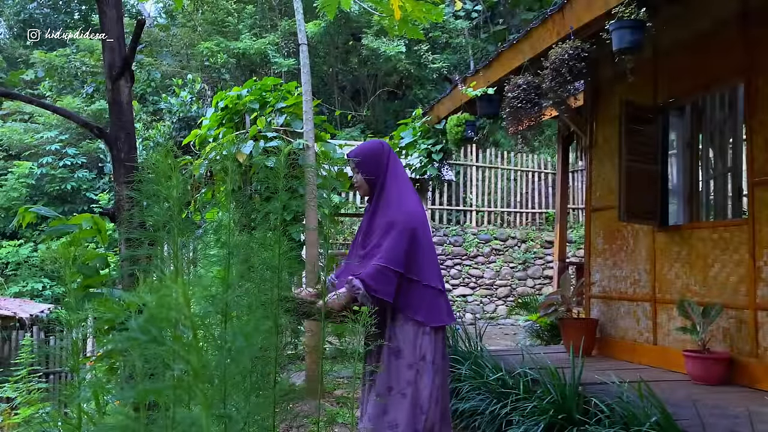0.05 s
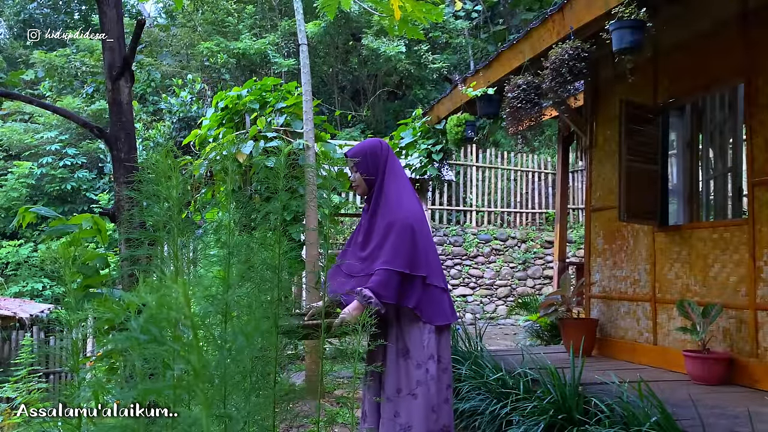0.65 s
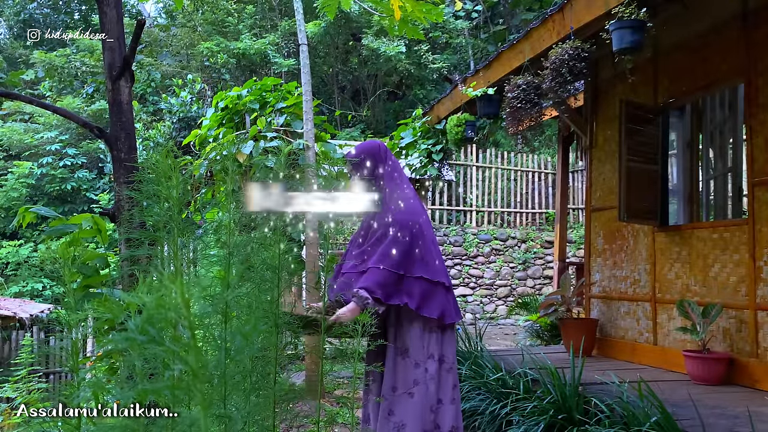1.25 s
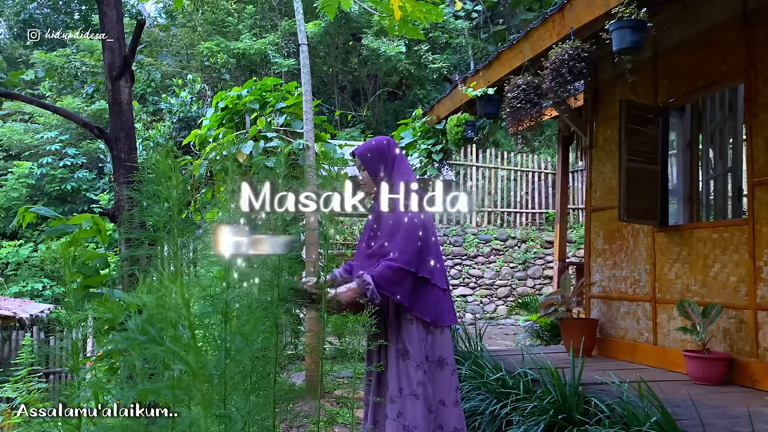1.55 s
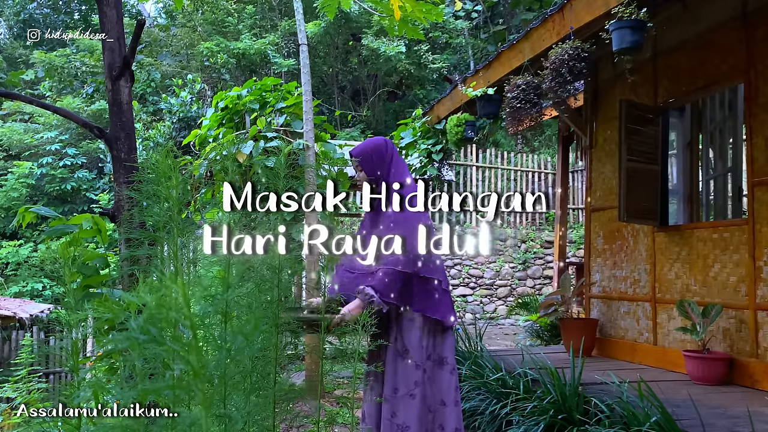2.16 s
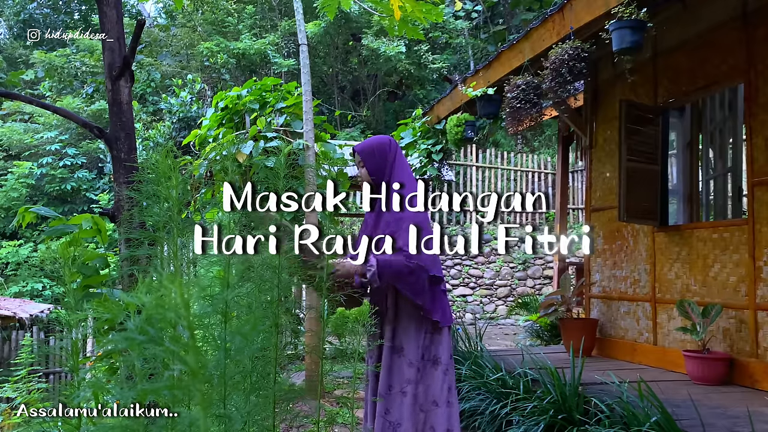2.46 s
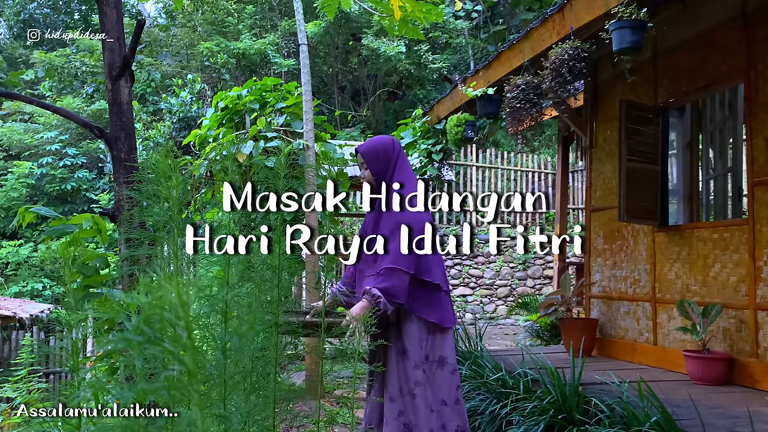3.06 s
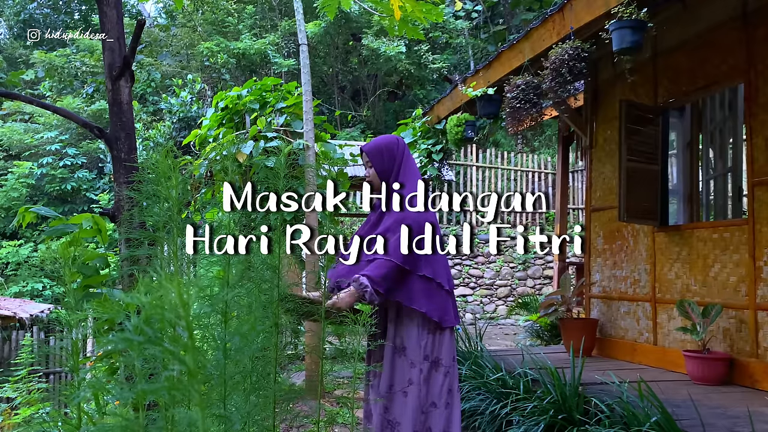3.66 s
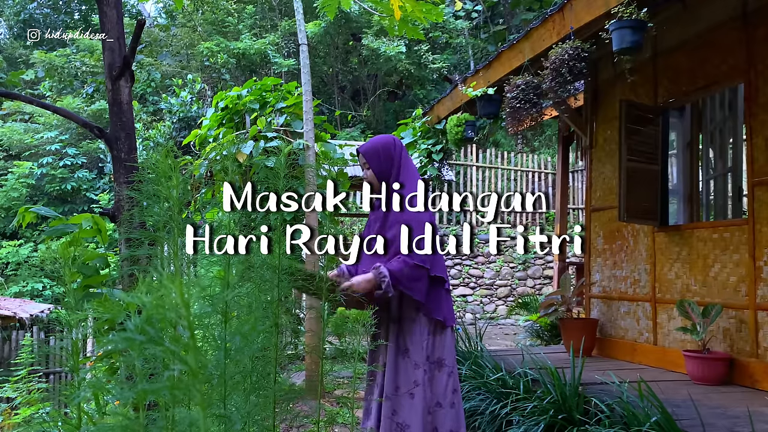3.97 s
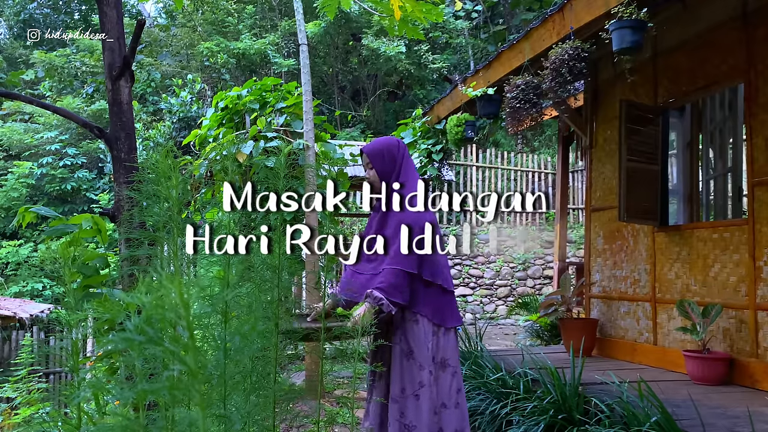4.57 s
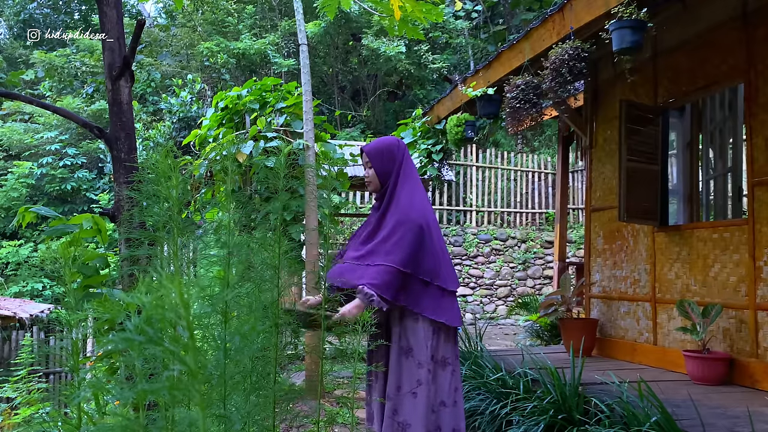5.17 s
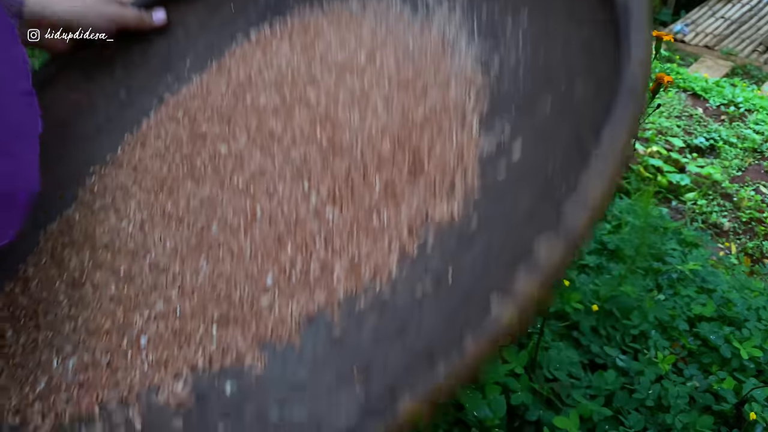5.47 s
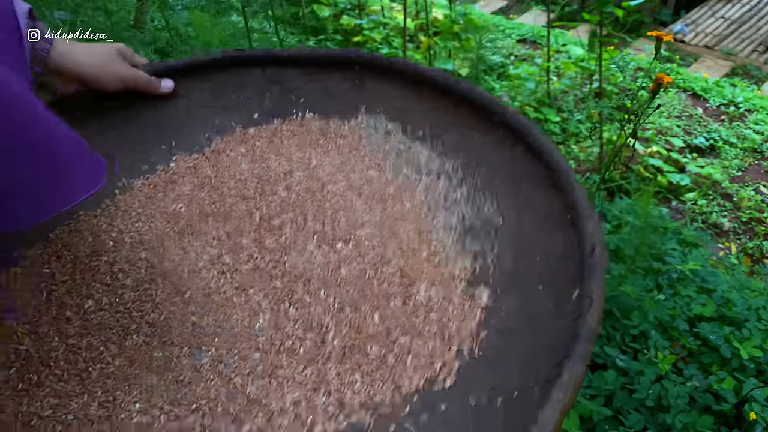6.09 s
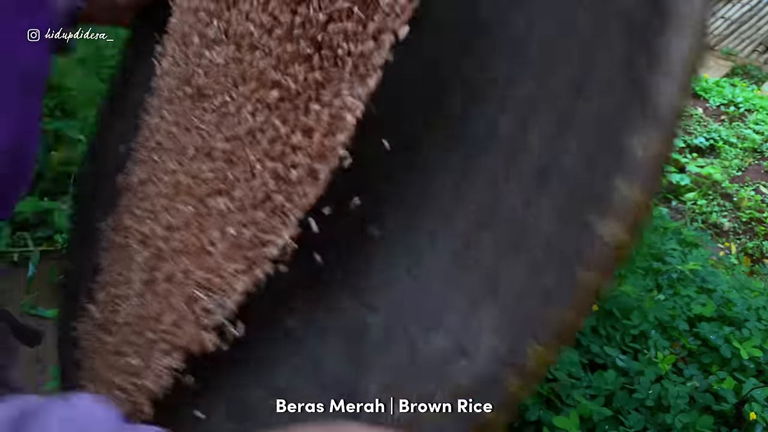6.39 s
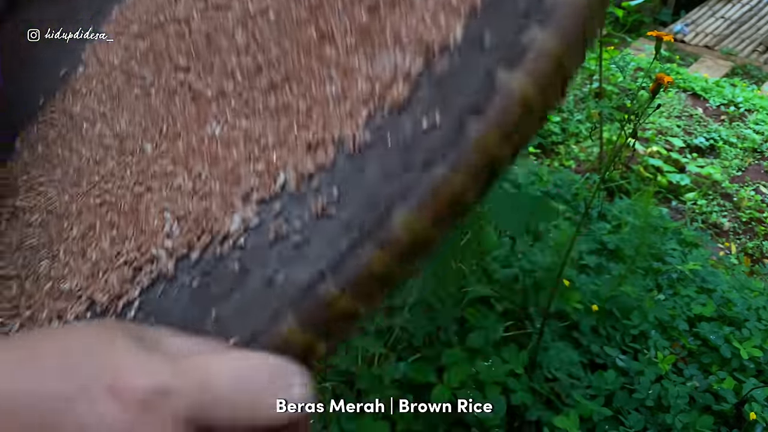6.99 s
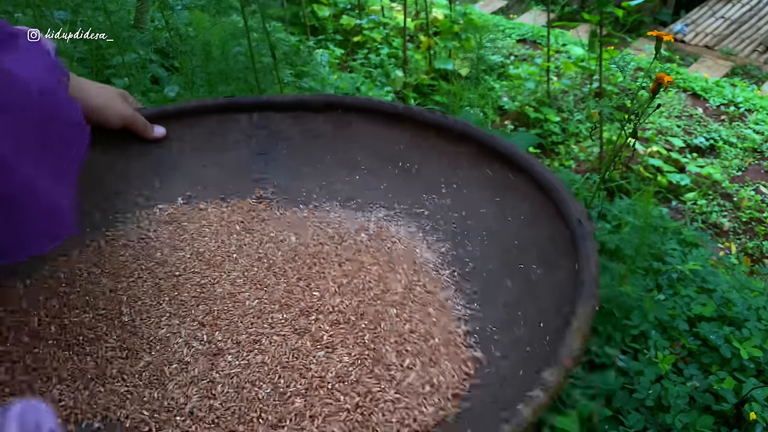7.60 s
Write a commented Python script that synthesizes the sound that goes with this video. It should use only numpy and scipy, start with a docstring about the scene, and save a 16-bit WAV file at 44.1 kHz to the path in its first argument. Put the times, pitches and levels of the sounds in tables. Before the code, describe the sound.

Rice is tossed on a large woven tray, close to the microphone in a quiet garden. Each landing is a swish about a quarter of a second long: a crisp spray on the bare weave, dulling as the heap grows and often closing with a soft slap. Tosses land at about 0.4, 1.1, 1.9 and 2.6 seconds. Around 3 seconds the heap skids in two short, duller shakes, and at 3.5 seconds the tray gives one dull knock, just ahead of the next toss. More follow at about 4.3, 5.0, 5.8, 6.4 and 7.2 seconds, then two quick shakes at 7.5 and 7.7 seconds. The moving tray fans soft, low puffs of air at the microphone. A light breeze and a steady outdoor hush lie underneath, with very little echo. From about 6.5 seconds a faint drone wavers like a far engine.

```python
"""Winnowing rice in a garden

Rice is tossed ten times on a large round woven tray and twice given a pair of short shakes. Each toss
is a shower of random impacts, first on the bare weave, then on the growing heap, ending in a slap.
One knock excites the tray's damped modes, and the moving tray fans air at the microphone.
Behind are a light breeze, a steady outdoor hush and, late on, a faint far drone."""
import sys
import numpy as np
from scipy import signal
from scipy.fft import rfft, irfft, next_fast_len
from scipy.io import wavfile
from scipy.ndimage import uniform_filter1d, map_coordinates

SR = 44100
rng = np.random.default_rng(int(sys.argv[2]) if len(sys.argv) > 2 else 0)


def pcm_store(signal):
    """Save signal as 16-bit PCM."""
    levels = np.round(np.clip(np.atleast_2d(signal), -1, 1) * 32767)
    wavfile.write(sys.argv[1], SR, levels.astype(np.int16).T)


N = 345744
TIME = np.arange(N) / SR

# narrow resonances of the weave and the hard grains: f/Hz, bandwidth/Hz, lift/dB
RICE_RESONANCES = [(703, 40, 2.5), (4080, 150, 2), (6200, 400, 2), (10500, 520, 2), (14100, 900, 1)]
def rice(patchy_db=1.42):
    """Resonance: all grains share the same peaks; the colour shifts as they hit different spots."""
    def lift(hz):
        return amp(sum(db / (1 + (2 * (hz - f) / width) ** 2) for f, width, db in RICE_RESONANCES))
    grains = filtered(tosses() + first_bounces() + shakes(), lift)
    spectra = signal.stft(grains, nperseg=512)[2]
    patches = uniform_filter1d(rng.standard_normal(spectra.shape), size=4, axis=0)  # across frequency
    patches = uniform_filter1d(patches, size=12, axis=1)  # across time
    return signal.istft(spectra * amp(patchy_db * unit(patches)), nperseg=512)[1][:N]


# sheets of rice landing: t/s, rise constant/s, duration/s, relative level/dB, slap offset/dB
TOSSES = [(0.423, 0.0034, 0.25, -27, 0), (1.13, 0.0034, 0.25, -27, 0.5), (1.871, 0.0041, 0.23, -27, 1.5),
          (2.552, 0.0048, 0.3, -27, -12), (3.533, 0.0029, 0.291, -28.5, -1),
          (4.262, 0.0016, 0.26, -26.5, -2), (5.023, 0.017, 0.2536, -25.5, -1.5),
          (5.759, 0.0098, 0.26, -26, -7), (6.446, 0.0035, 0.25, -25.5, -4),
          (7.157, 0.0017, 0.26, -26, -14.5)]
# spectra of impacts on the bare weave, on the heap and in the closing slap: f/Hz, relative level/dB
WEAVE_SPECTRUM = [(90, -21), (200, -19.5), (400, -6), (670, -2), (1080, -3.5), (1540, 0.5), (1900, -8),
                  (2600, -10), (4100, -5.5), (4700, -12.5), (6400, -17), (7800, -22), (9700, -22.5),
                  (13000, -26.5)]
HEAP_SPECTRUM = [(90, -10.5), (200, -5), (400, 2.5), (700, -0.5), (1100, -3), (1580, 0.5), (1850, -4.5),
                 (2600, -9), (3300, -7), (4150, -7), (4750, -18.5), (7900, -24.5), (10000, -24),
                 (13000, -26.5)]
SLAP_SPECTRUM = [(80, -19), (220, -12), (450, -0.5), (750, -3.5), (1100, -12.5), (1550, -3.5),
                 (2600, -19.5), (4100, -9), (5000, -24), (8000, -28), (14000, -28)]
def tosses(cover_s=0.105, thinning_s=0.017, fade_db_per_s=13, stray_db=-23, stray_db_per_s=70):
    """Damping: rice covers the weave, so the hiss dulls; the bulk lands last, then strays settle."""
    bare, heap, slap = np.zeros((3, N))
    for start, rise, duration, db, slap_db in TOSSES:
        end = start + duration
        age = np.maximum(TIME - start, 0)
        sheet = step((end - TIME) / thinning_s) * amp(-fade_db_per_s * age)
        strays = amp(stray_db - stray_db_per_s * np.maximum(TIME - end, 0))
        thin_edge = amp(-3.5 * np.exp(-age / 0.008))  # the front of the sheet holds fewer grains
        flow = amp(db) * step((TIME - start) / rise) * thin_edge * np.hypot(sheet, strays)
        uncovered = np.exp(-age / cover_s)
        bare += flow * np.sqrt(uncovered)
        heap += flow * np.sqrt(1 - uncovered)
        slap += amp(db + slap_db) * bell(end - 0.018, width_s=0.015)
    clumps = amp(0.45 * wobble(45))  # the sheet is uneven
    on_weave = coloured(impacts(bare * clumps, grains_per_s=44000, spread_db=2.5), WEAVE_SPECTRUM)
    on_heap = coloured(impacts(heap * clumps, grains_per_s=60000, spread_db=0.5), HEAP_SPECTRUM)
    landing = coloured(impacts(slap, grains_per_s=30000, spread_db=0), SLAP_SPECTRUM)
    return amp(0.5) * on_weave + amp(-1.5) * on_heap + amp(-1) * landing


# spectrum of bouncing grains: f/Hz, relative level/dB
BOUNCE_SPECTRUM = [(400, -28), (1500, -8), (2600, -13), (4000, 2), (5200, 0), (6400, 2), (7800, -10),
                   (9700, 0), (12000, -9), (14000, -21)]
def first_bounces(offset_db=-14.5, lag_s=0.026):
    """Elastic rebound: the first free grains of each toss bounce off the bare weave in a crisp spray."""
    spray = np.zeros(N)
    for start, rise, _, db, _ in TOSSES:
        spray += amp(db + offset_db) * step((TIME - start) / rise) * bell(start + lag_s, width_s=0.018)
    return coloured(impacts(spray, grains_per_s=12000, spread_db=6), BOUNCE_SPECTRUM)


# slides of the heap: centre t/s, half width/s, level/dB
SHAKES = [(2.938, 0.033, -27.5), (3.073, 0.029, -36.5), (7.534, 0.028, -31.5), (7.665, 0.031, -32.3)]
# spectrum of skidding grains: f/Hz, relative level/dB
SKID_SPECTRUM = [(90, -25), (200, -6), (420, -1), (700, -2), (1100, -3.5), (1580, 0), (1900, -7),
                 (2600, -10.5), (4100, -9), (4750, -18), (6500, -24), (7900, -28.5), (10000, -30),
                 (13000, -35)]
def shakes(roll_db=-26):
    """Sliding friction: the heap skids, duller than when it falls; loose grains roll a little longer."""
    flow = np.zeros(N)
    for centre, width, db in SHAKES:
        flow += amp(db) * (bell(centre, width) + amp(roll_db) * bell(centre, 5 * width))
    return coloured(impacts(flow, grains_per_s=45000, spread_db=2), SKID_SPECTRUM)


# the two contacts of the knock: t/s, level/dB
KNOCK_CONTACTS = [(3.4582, -11.5), (3.4628, -28)]
# modes of the loaded tray: f/Hz, relative level/dB, T60/s
TRAY_MODES = [(95, 0, 0.056), (217, -8.5, 0.076), (280, 3, 0.048), (347, -10.5, 0.075), (506, -3, 0.037),
              (650, -11.5, 0.05), (840, -4.5, 0.033), (877, -15, 0.07), (1300, -16, .02),
              (1650, -11.5, .018), (2120, -27, 0.026), (2580, -31, 0.022)]
# spectrum of the contact noise: f/Hz, relative level/dB
TICK_SPECTRUM = [(100, -10), (400, 3), (850, -3), (1150, -11), (1650, -9), (2600, -12.5), (4100, -13),
                 (6000, -29), (9000, -39), (14000, -42)]
def knock(attack_s=0.0011, tick_db=-19, tick_t60_s=0.016):
    """Damped free vibration: a dull double contact rings the tray, and the rice soon stills it."""
    sound = np.zeros(N)
    for start, db in KNOCK_CONTACTS:
        age = np.maximum(TIME - start, 0)
        modes = sum(amp(level - 60 * age / t60) * np.sin(2 * np.pi * hz * age)
                    for hz, level, t60 in TRAY_MODES)
        tick_envelope = (age > 0) * amp(tick_db - 60 * age / tick_t60_s)
        tick = coloured(tick_envelope * rng.standard_normal(N), TICK_SPECTRUM)
        sound += amp(db) * (modes * (1 - np.exp(-age / attack_s)) + tick)
    return sound


# puffs fanned by the shakes: centre t/s, half width/s, level/dB
PUFFS = [(2.95, 0.12, -25.5), (3.085, 0.041, -20.5), (7.71, 0.032, -15)]
# pressure spectra of a puff and of the breeze: f/Hz, relative level/dB
PUFF_SPECTRUM = [(5, 0.5), (14, -2.5), (30, -7.5), (55, -27.5), (120, -34.5), (400, -89)]
BREEZE_SPECTRUM = [(2, 2.5), (6, -7), (12, -2.5), (25, -28.5), (50, -27.5), (100, -42.5), (200, -43.5),
                   (500, -100)]
def moving_air(breeze_db=-31, swing_db=-30, lead_s=0.0084):
    """Pressure fluctuation: the breeze and air fanned by the tray sway the microphone's membrane."""
    # the tray drops fastest just before the rice lands
    swings = sum(amp(swing_db) * bell(start - lead_s, width_s=0.092) for start, *_ in TOSSES)
    breeze = amp(breeze_db + 0.86 * wobble(2.74))
    puffs = sum(amp(db) * bell(centre, width) for centre, width, db in PUFFS)
    return (breeze + swings) * noise(BREEZE_SPECTRUM) + puffs * noise(PUFF_SPECTRUM)


def reflections(sound, wet_db=-24, t60_s=0.58, delay_s=0.031):
    """Scattering: the house wall and the foliage return a weak, short tail."""
    t = np.arange(SR // 2) / SR
    tail = rng.standard_normal(len(t)) * amp(-60 * t / t60_s) * (t > delay_s)
    return amp(wet_db) * signal.fftconvolve(sound, tail / np.linalg.norm(tail))[:N]


# spectrum of the outdoor hush: f/Hz, relative level/dB
HUSH_SPECTRUM = [(60, -12.5), (100, -2), (240, -5.5), (620, -3), (1000, -7), (1480, -10), (2200, -25),
                 (2900, -26.5), (3950, -23), (4500, -32.5), (6400, -33), (7100, -37), (10000, -41),
                 (15000, -51)]
def garden_hush(level_db=-46.5):
    """Stationary noise: an even outdoor hush, strongest at low frequencies."""
    return amp(level_db) * noise(HUSH_SPECTRUM)


# partials of the drone: f/Hz, relative level/dB
DRONE_PARTIALS = [(232, -15), (275, -10), (318, -10.5)]
def far_drone(level_db=-49.5, arrival_s=6.5, rise_s=0.17, fade_db_per_s=2.5):
    """Phase modulation: three tones waver like a far engine, swelling and then slowly fading."""
    tones = sum(amp(db) * np.sin(2 * np.pi * hz * TIME + wobble(7)) for hz, db in DRONE_PARTIALS)
    age = TIME - arrival_s
    swell = step(age / rise_s) * amp(level_db - fade_db_per_s * np.maximum(age, 0))
    return swell * unit(tones)


def impacts(strength, grains_per_s, spread_db):
    """Shot noise of rms = strength: uneven impacts merge at full flow and thin out as it ends."""
    chance = np.clip(grains_per_s / SR * np.sqrt(strength / strength.max()), 1e-6, 1)
    sizes = unit(rng.standard_normal(N) * amp(spread_db * np.clip(rng.standard_normal(N), -2, 2)))
    hits = rng.random(N) < chance
    return strength * sizes * hits / np.sqrt(chance)


def coloured(x, spectrum, size=32768):
    """Convolution with a minimum-phase response of unit energy, shaped by (f/Hz, level/dB) points."""
    hz, db = np.transpose(spectrum)
    bin_hz = np.fft.rfftfreq(size, 1 / SR)
    gain = amp(np.interp(np.log(bin_hz + 1), np.log(hz + 1), db))
    cepstrum = irfft(np.log(gain))
    cepstrum[1:size // 2] *= 2  # folding the cepstrum makes the response causal
    cepstrum[size // 2 + 1:] = 0
    response = irfft(np.exp(rfft(cepstrum)))
    return signal.fftconvolve(x, response / np.linalg.norm(response))[:N]


def noise(spectrum):
    """Gaussian noise of rms 1 with the given spectrum."""
    return unit(coloured(rng.standard_normal(N), spectrum))


def filtered(x, gain):
    """Zero-phase filtering by a gain that is a function of frequency."""
    size = next_fast_len(N + SR // 2)
    return irfft(rfft(x, size) * gain(np.fft.rfftfreq(size, 1 / SR)), size)[..., :N]


def amp(db):
    """Decibels to amplitude ratio."""
    return 10 ** (np.asarray(db) / 20)


def unit(x):
    """Normalisation to rms 1."""
    return x / np.sqrt(np.mean(x ** 2) + 1e-20)


def step(u):
    """Logistic rise from 0 to 1 around u = 0."""
    return 0.5 + 0.5 * np.tanh(u / 2)


def bell(centre_s, width_s):
    """Gaussian envelope of height 1."""
    return np.exp(-0.5 * ((TIME - centre_s) / width_s) ** 2)


def wobble(knots_per_s):
    """Spline interpolation through random knots."""
    knots = rng.standard_normal(int(N * knots_per_s / SR) + 4)
    return map_coordinates(knots, [TIME * knots_per_s])


def scene():
    """Superposition: the tray, its reflections and the background add at one point in the open air."""
    tray = rice() + knock()
    return (tray + reflections(tray) + moving_air() + garden_hush() + far_drone())[None]


def record(dry, low_hz=4, edge_hz=14200, top_hz=15700, droop_db=-12):
    """Band limiting: the slowest drift is blocked, and the top treble droops, then cuts off."""
    def passband(hz):
        high_pass = hz / np.hypot(hz, low_hz)
        droop = amp(droop_db * np.clip((hz - edge_hz) / (top_hz - edge_hz), 0, 1))
        return high_pass * droop * (hz < top_hz)
    return filtered(dry, passband)


dry = scene()
out = record(dry)
pcm_store(out)
```